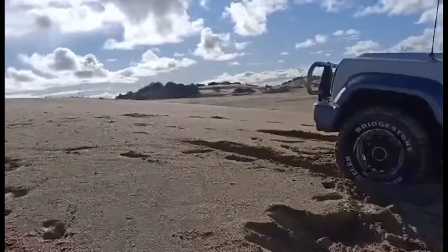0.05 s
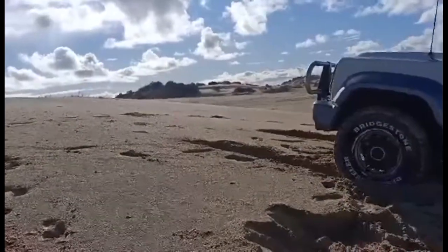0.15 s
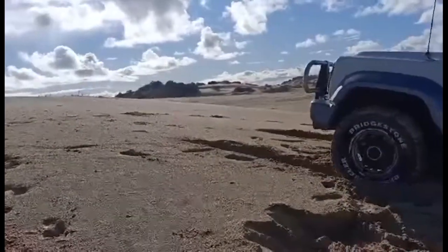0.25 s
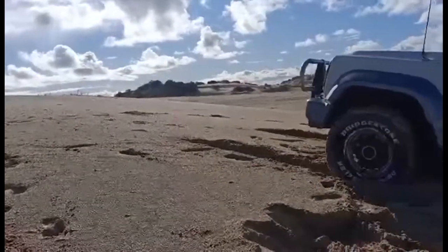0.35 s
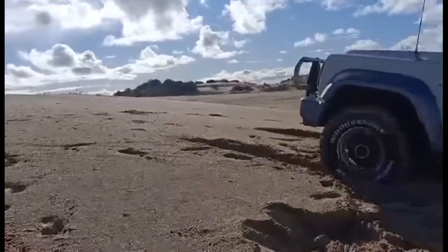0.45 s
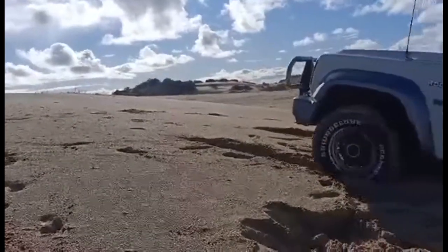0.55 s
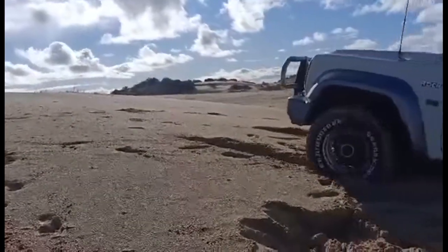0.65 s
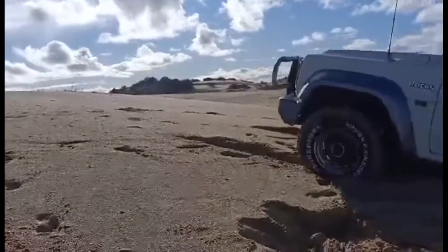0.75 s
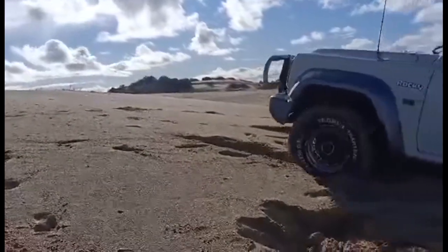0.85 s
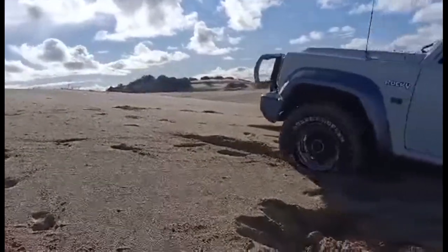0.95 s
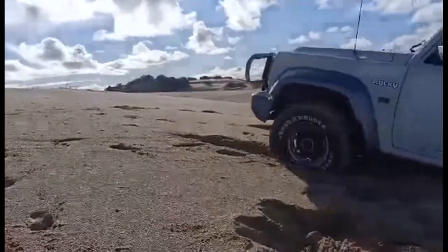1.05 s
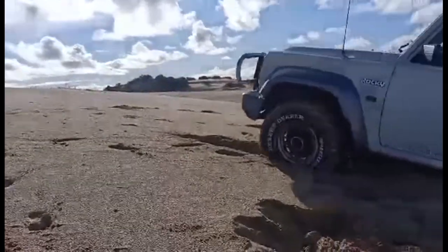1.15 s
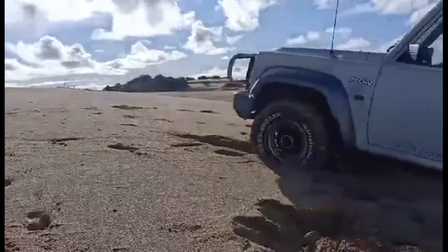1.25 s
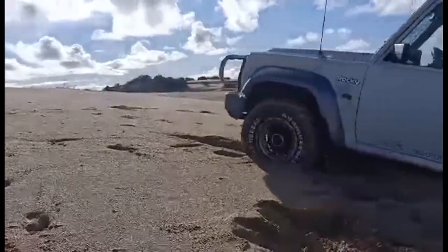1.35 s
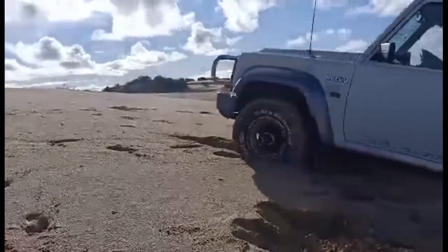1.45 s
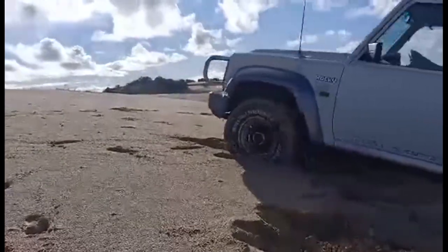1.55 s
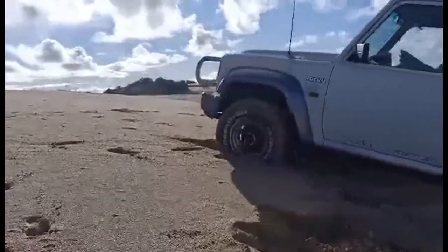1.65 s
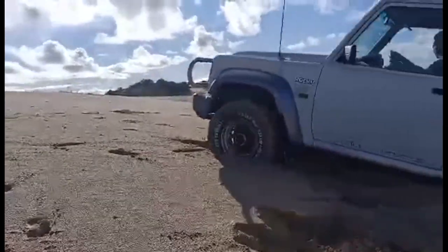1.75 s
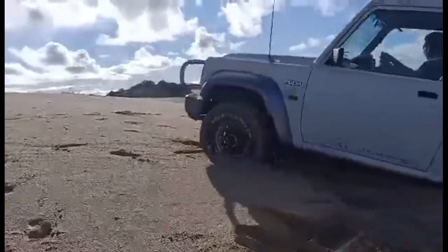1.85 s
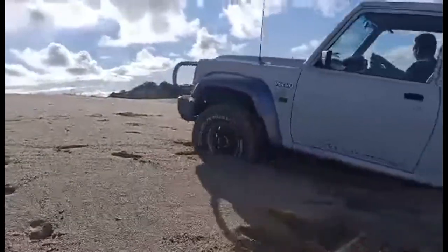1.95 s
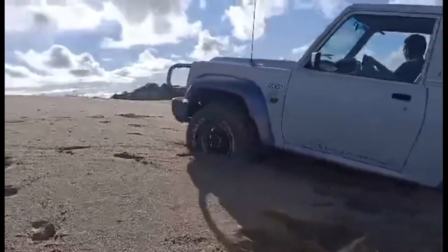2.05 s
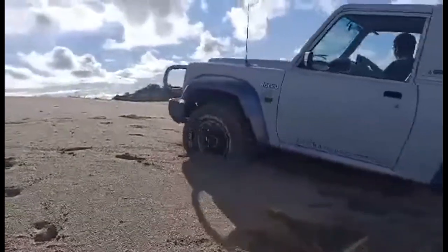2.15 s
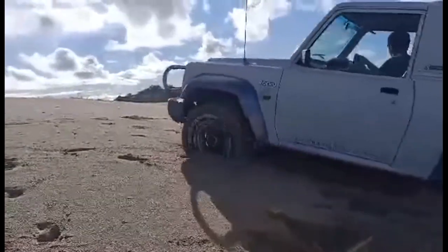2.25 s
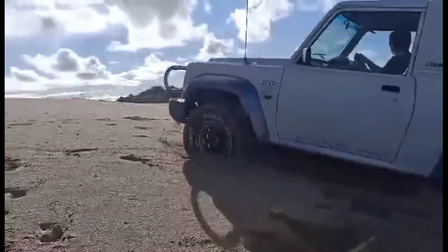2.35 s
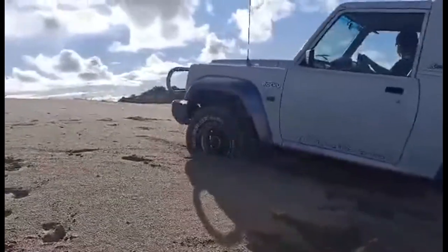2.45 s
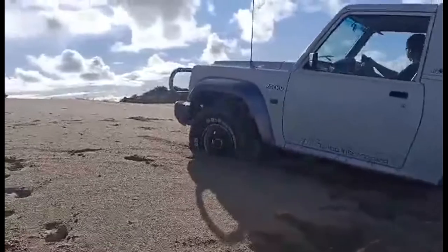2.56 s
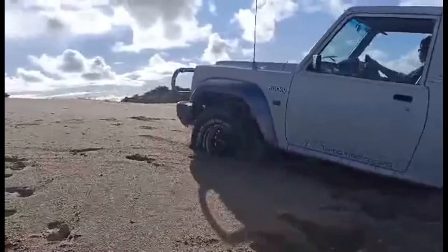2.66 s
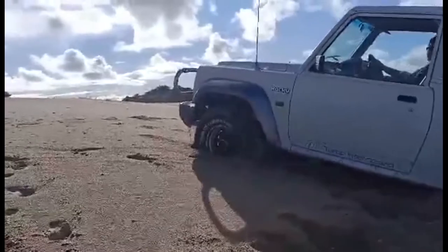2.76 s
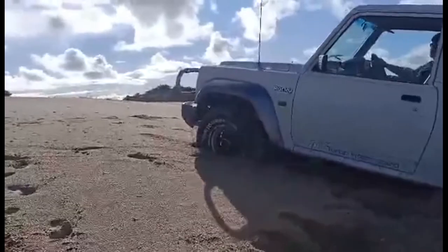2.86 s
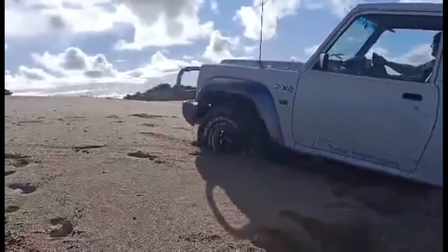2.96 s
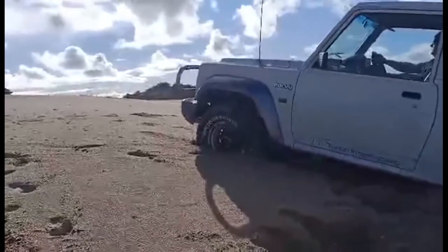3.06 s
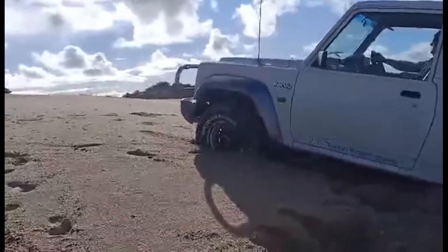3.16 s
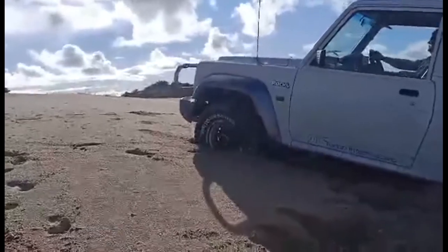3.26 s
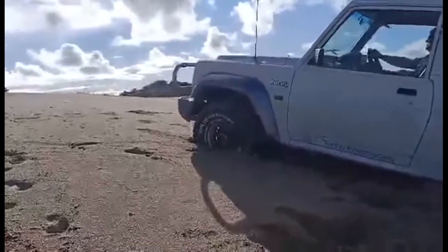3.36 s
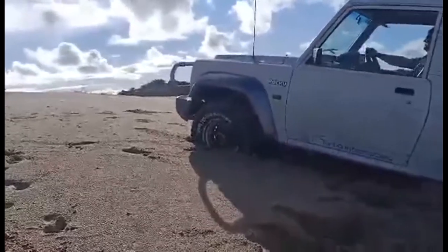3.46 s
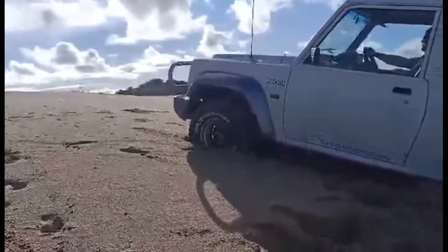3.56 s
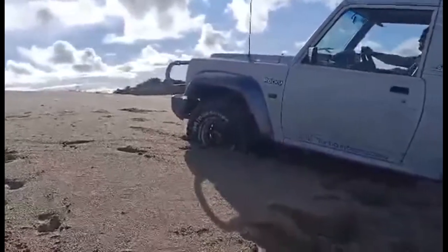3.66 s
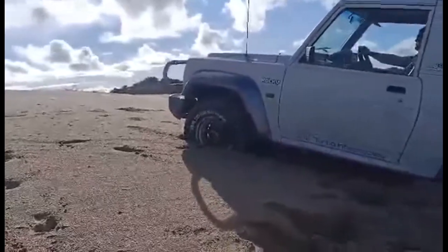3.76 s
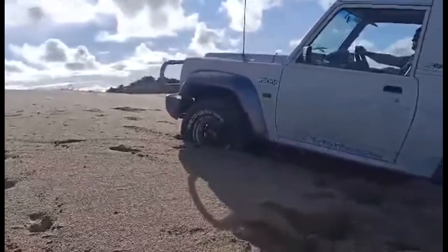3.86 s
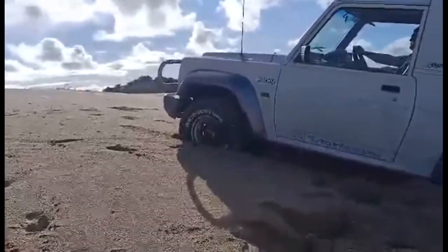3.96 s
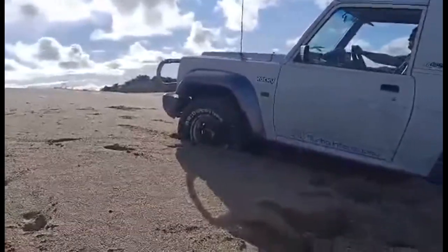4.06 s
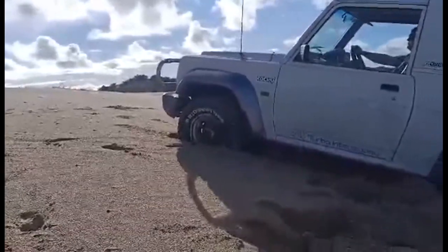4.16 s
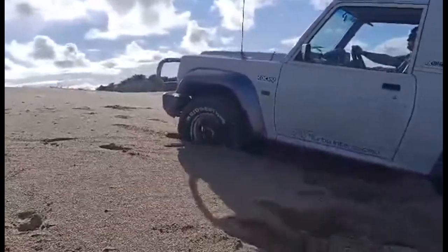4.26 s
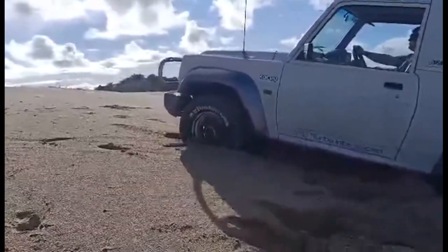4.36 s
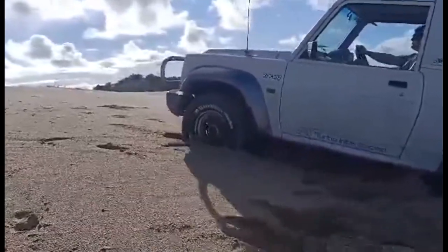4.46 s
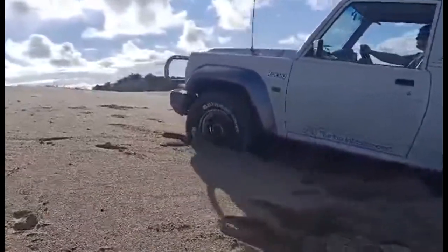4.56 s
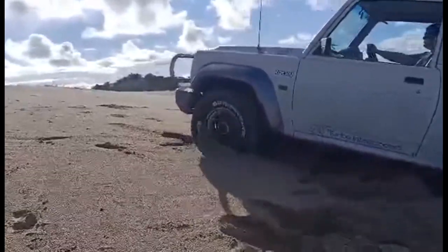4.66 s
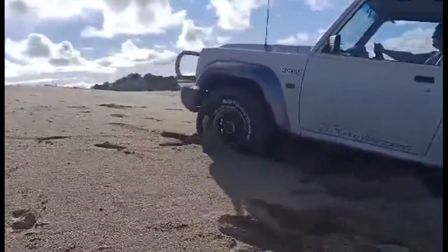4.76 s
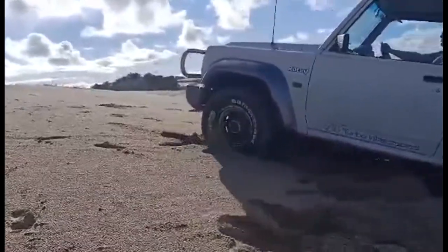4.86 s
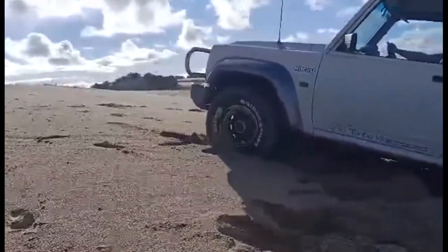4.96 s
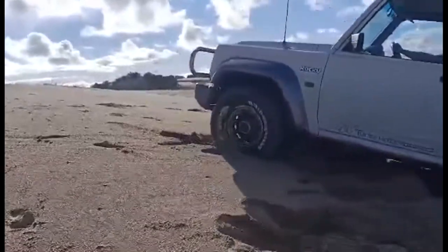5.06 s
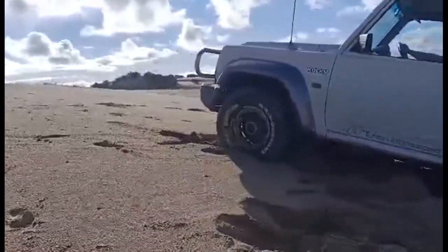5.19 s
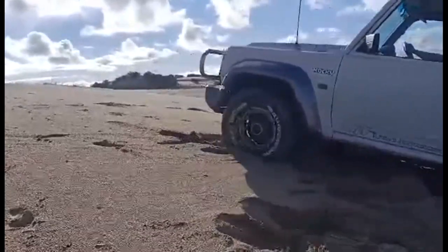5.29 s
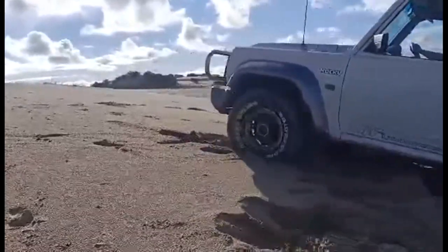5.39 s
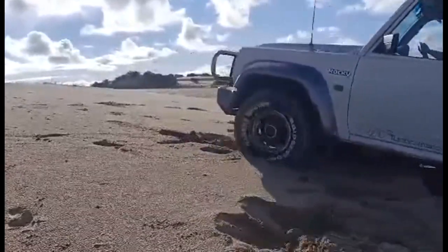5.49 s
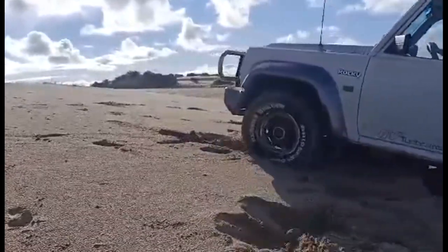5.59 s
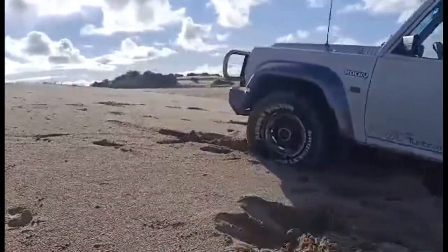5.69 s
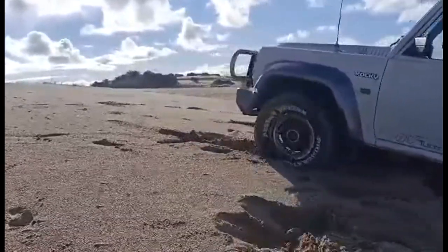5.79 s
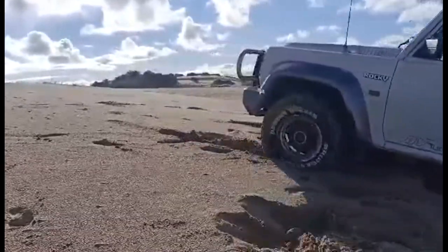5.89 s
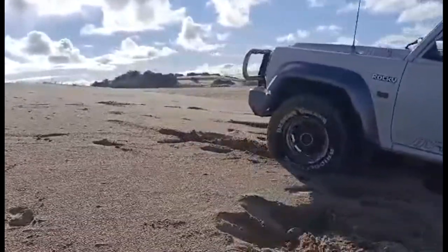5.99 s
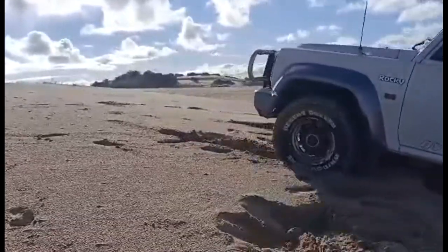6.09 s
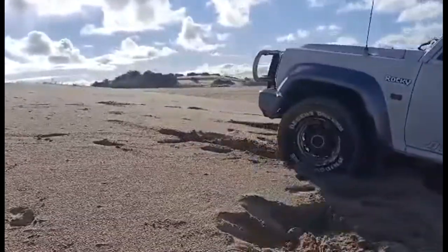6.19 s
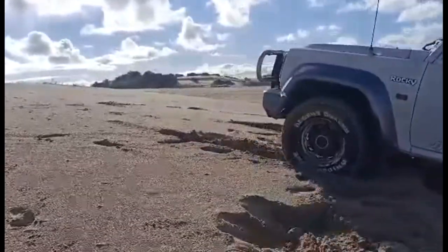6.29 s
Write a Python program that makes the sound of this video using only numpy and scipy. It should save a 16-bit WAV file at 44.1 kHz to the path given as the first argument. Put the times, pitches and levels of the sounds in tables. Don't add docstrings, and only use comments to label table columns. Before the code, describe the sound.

A four-cylinder turbo diesel off-roader is heard close by on an open beach, dry and without echo, through a small microphone with limited deep bass. It begins with a low roar at slow revs, then picks up by 0.3 seconds with two short driveline knocks. The muffler rings at about 0.8 as the wheels bite. From 1 to 2.4 seconds the engine pulls harder and faster, with throbbing, popping exhaust, sharp rhythmic clatter and growing turbo hiss. It flares loudest around 2.5, injectors pinging and the rattle turning more continuous. At 2.8 the load drops with a clunk; a low burble follows near 2.9 as revs fall until about 3.6. A quieter, uneven idle runs on, swelling slightly toward 4.7. Small knocks come at 4.9, where the engine sinks and a low roar lurches, again at 5.3. Slow, soft throbbing with dull knocks continues to the end near 6.3.

```python
import sys
import numpy as np
from scipy import signal
from scipy.fft import rfft, irfft, next_fast_len
from scipy.io import wavfile
from scipy.ndimage import uniform_filter1d

SR = 44100
rng = np.random.default_rng(int(sys.argv[2]) if len(sys.argv) > 2 else 0)


def generate_wav(sig):
    pcm = np.round(np.clip(np.atleast_2d(sig).T, -1, 1) * 32767).astype(np.int16)
    wavfile.write(sys.argv[1], SR, pcm)


def convert_level_to_amplitude(level_db):
    exponent = np.asarray(level_db, float) / 20
    return 10 ** exponent


N = 279153


def rms_one(x):
    return x / np.sqrt(np.mean(x ** 2) + 1e-20)


def evened(x, seconds=0.167):
    return x / np.sqrt(uniform_filter1d(x ** 2, int(seconds * SR), mode="reflect") + 1e-12)


def in_time(rows):
    s, *columns = np.transpose(rows)
    return [np.interp(np.arange(N) / SR, s, c) for c in columns]


def swell(s, half_s, db):
    return db * np.exp(-((np.arange(N) / SR - s) / half_s) ** 2)


def coloured(x, points):
    hz, db = np.transpose(points)
    size = next_fast_len(N)
    grid = np.log(np.arange(size // 2 + 1) * SR / size + 1)
    gain_db = np.interp(grid, np.log(hz), db, left=-90, right=-90)
    return irfft(rfft(x, size) * convert_level_to_amplitude(gain_db), size)[:N]


def resonances(x, modes):
    out = 0
    for k, (hz, width_hz, db) in enumerate(modes):
        r = np.exp(-np.pi * width_hz / SR)
        b = (-1) ** k * convert_level_to_amplitude(db) * (1 - r * r) / 2 * np.array([1, 0, -1])
        a = [1, -2 * r * np.cos(2 * np.pi * hz / SR), r * r]
        out = out + signal.lfilter(b, a, x + 1e-18)
    return out


# pop in dB, ping in dB, clatter in dB.
CYLINDERS = [
    [(-11, -5, -3), (0, -1, -2), (-16, -6, -3.5), (-12, 0, 0)],
    [(-1, 0, -.5), (-2, -4, -1.5), (-1.5, -.5, -.3), (-2.5, -5, -2.5)],
]


def firings(turns, pulling, column, early, scatter_db):
    number = np.floor(turns + early).astype(int)
    at = np.flatnonzero(np.diff(number)) + 1
    loaded, free = np.array(CYLINDERS)[:, number[at] % 4, column]
    luck = rng.standard_normal(N // 500)[:len(at)]
    clicks = np.zeros(N)
    clicks[at] = convert_level_to_amplitude(loaded * pulling[at] + free * (2.5 - pulling[at]) + scatter_db * luck)
    return clicks


def burst(clicks, rise_s, fall_s):
    for s in (rise_s, fall_s):
        r = np.exp(-1 / (s * SR))
        clicks = signal.lfilter([1 - r], [1, -r], clicks + 1e-18)
    return evened(clicks)


def gritty(spread_db):
    grains_db = spread_db * rng.standard_normal(N // 40 + 1).repeat(40)[:N]
    return rms_one(rng.standard_normal(N) * convert_level_to_amplitude(grains_db))


def struck(shaking, turns, modes, uneven_db):
    number = np.floor(turns + 0.36).astype(int) + 1
    luck = convert_level_to_amplitude(uneven_db * rng.standard_normal((len(modes), N // 500)))
    out = 0
    for k, (mode, own) in enumerate(zip(modes, luck)):
        out = out + resonances(shaking * own[number], [mode]) * (-1) ** k
    return out


def follow(engine, usual_db, share, per_octave_db, pull_db):
    drive_db, per_s, pulling = engine
    swing_db = share * (drive_db + 40)
    return usual_db + swing_db + per_octave_db * np.log2(per_s / 35) + pull_db * pulling


def on_pipe_mode(per_s):
    return 1 / (1 + ((4 * per_s - 246.6) / 49) ** 2)


def merged_db(per_s):
    return -0.64 * np.maximum(per_s - 65, 0)


# frequency in Hz, level in dB.
EXHAUST = [(22, -24), (34, -11), (50, 2.5), (89, 9), (124, 3), (140, -11), (185, 0.5), (245, -3.5)]


def throb(turns, engine, pop_db):
    hz, db = np.transpose(EXHAUST)
    fuel_db, per_s, pulling = engine
    lag_s, phase_turns = .006, (.3, .3, .55, .85, .6)
    burble_db = swell(2.91, .17, 8)
    tuning = 1 + 0.071 * np.clip((per_s - 55) / 25, 0, 1)
    levels_db = []
    for k in range(1, 5):
        from_burble = (k * per_s - 190) / 35
        order_db = fuel_db + np.interp(np.log(k * per_s / tuning), np.log(hz), db)
        order_db = order_db + (k - 1) * merged_db(per_s) + burble_db / (1 + from_burble ** 2)
        levels_db.append(order_db - 10 * (1 - pulling) * np.clip(from_burble - .5, 0, 1))
    fifth_db = pop_db - 8 * (1 - pulling) + 1.3 * merged_db(per_s) - 4
    levels_db.append(fifth_db - 20 * np.log10(1 + ((5 * per_s - 205) / 70) ** 2))
    out = 0
    for k, level_db in enumerate(levels_db):
        cycle = (k + 1) * (turns - lag_s * per_s) + phase_turns[k]
        out = out + np.sqrt(2) * convert_level_to_amplitude(level_db) * np.cos(2 * np.pi * cycle)
    return out


# frequency in Hz, width in Hz, level in dB.
PIPE_MODES = [(186.2, 57, -0.5), (233.2, 70.5, -1.5)]
# frequency in Hz, width in Hz, level in dB.
MUFFLER_MODES = [(291.6, 94, 5), (446, 128, -9)]
# frequency in Hz, level in dB per Hz.
RUMBLE = [(18, -52), (30, -6), (138, -4.5), (234, -5), (283, -17), (318, -8.5), (353, -19), (517, -24),
          (635, -29.5), (1000, -36.5), (1300, -94), (2200, -120)]
# middle in seconds, half length in seconds, level in dB.
RING_SWELLS = [
    (.78, .12, 5),
    (2.42, .12, 2.5),
    (4.5, .25, 3),
]
# middle in seconds, half length in seconds, level in dB.
LURCHES = [
    (.01, 0.099, 6),
    (4.932, 0.1, 5.5),
    (5.33, 0.13, 4),
    (3.31, 0.085, -1.5),
    (4.54, 0.23, -3.5),
]


def tail_pipe(turns, engine, pop_db):
    fuel_db, per_s, pulling = engine
    ring_db = follow(engine, usual_db=-38.5, share=1.02, per_octave_db=-2, pull_db=-6)
    ring_db = ring_db + 9 * on_pipe_mode(per_s) + 0.62 * merged_db(per_s)
    ring_db = ring_db + sum(swell(*row) for row in RING_SWELLS)
    capped = (fuel_db, np.minimum(per_s, 42), pulling)
    roar_db = follow(capped, usual_db=-35, share=0.102, per_octave_db=6, pull_db=8)
    roar_db = roar_db - 2 * on_pipe_mode(per_s) + sum(swell(*row) for row in LURCHES)

    slugs = firings(turns, pulling, column=0, early=.3 + .0058 * per_s, scatter_db=1.5)
    pops = evened(resonances(resonances(slugs, PIPE_MODES), [(235, 440, 0)]))
    rough = slugs + 0.017 * (1 - 0.14 * pulling) * rng.standard_normal(N)
    ring = evened(resonances(resonances(rough, MUFFLER_MODES), [(313.5, 173, 0)]))

    gusts = firings(turns, 0 * pulling, column=0, early=0.064, scatter_db=8.5)
    puffs = 5.5 + burst(gusts, 0.003, 0.028)
    flow = coloured(puffs * rng.standard_normal(N), RUMBLE)
    flow = signal.sosfilt(signal.butter(2, 40, "high", fs=SR, output="sos"), flow)
    rumble = evened(flow + 0.56 * resonances(flow, [(130, 91, 0)]), 0.55)
    exhaust = convert_level_to_amplitude(pop_db - 5.5) * pops + convert_level_to_amplitude(ring_db - 5.0) * ring
    return exhaust + convert_level_to_amplitude(roar_db + 2.5 - 7.1 * pulling) * rumble


# frequency in Hz, width in Hz, level in dB.
COVER_MODES = [(2053, 78, 7.5), (2760, 170, -14), (3762, 91, 0.5)]
# frequency in Hz, level in dB per Hz.
CLATTER = [(820, -30), (1400, -30), (1500, -11), (1710, -13.5), (2080, -14), (2290, -14.5), (2590, -9.5),
           (3110, -12), (3780, -10.5), (4850, -26.5), (6110, -22.5), (6860, -14.5), (9160, -23.5),
           (13300, -28), (14000, -21)]
# frequency in Hz, level in dB per Hz.
IDLE_CLATTER = [(820, -39), (1400, 3), (1670, -8), (1830, -6), (2400, -11.5), (3240, -8), (5090, -20),
                (6290, -13.5), (7200, -12), (10400, -21.5), (14000, -21.5)]
# frequency in Hz, width in Hz, level in dB.
PING_MODES = [(729, 52, 2), (876, 87, 0), (1072, 197, 0), (1257.5, 78, 5.5), (1257, 73, 4.5),
              (1410, 110, -1.5)]


def block(turns, engine, locked):
    clatter_db, per_s, pulling = engine
    loose = np.sqrt(1 - locked ** 2)
    knock = burst(firings(turns, pulling, column=2, early=0.26, scatter_db=-0.68), 0.004, 0.0057)
    casting = [(hz, 0.033 * hz, 0) for hz in np.geomspace(1500, 14000, num=36)]
    shaking = (locked * knock + loose) * gritty(2.5)
    rattle = struck(shaking, turns, [*casting, *COVER_MODES], uneven_db=2.5)
    loaded = evened(coloured(rattle, CLATTER), 0.237)
    free = evened(coloured(rattle, IDLE_CLATTER), 0.237)
    clatter = evened(pulling * loaded + (1 - pulling) * free, 0.199)

    advance = 0.14 + 0.2 * pulling
    opening = firings(turns, pulling, column=1, early=advance, scatter_db=1.5)
    ticks = burst(opening, 0.0015, 0.0016) + 1.85 * knock
    shaking = (locked * evened(ticks) + .9 * loose) * gritty(2.0)
    ping = struck(shaking, turns, PING_MODES, uneven_db=2.5)
    ping = signal.sosfilt(signal.butter(2, [640, 1600], "band", fs=SR, output="sos"), ping)
    ping_db = follow(engine, usual_db=-31, share=1.5, per_octave_db=-2.4, pull_db=1.5)
    ping_db = ping_db + swell(2.49, 0.07, 3.1)
    return convert_level_to_amplitude(clatter_db) * clatter + convert_level_to_amplitude(ping_db - 2.5) * evened(ping, 0.266)


def turbo(turns, engine):
    hiss = resonances(resonances(gritty(1.7), [(6860, 750, 0)]), [(6240, 2500, 0)])
    boost = np.clip((engine[1] - 36) / 26, .1, 1)
    gulps = 1 + 0.66 * np.cos(2 * np.pi * (turns - .05))
    hiss_db = follow(engine, usual_db=-47, share=1.6, per_octave_db=3, pull_db=1)
    hiss_db = hiss_db + swell(2.22, 0.24, 4.2)
    return convert_level_to_amplitude(hiss_db - 4.5) * boost * gulps * rms_one(hiss)


# start in seconds, peak level in dB, frequency in Hz, decay in seconds.
CLUNKS = [(0.226, -17, 185, 0.0025), (0.333, -15, 250, 0.0014), (2.8086, -15.5, 281, 0.0075),
          (2.83, -37.5, 3640, 0.0026), (4.2, -37.5, 537, 0.0034), (4.903, -24, 490, 0.0015),
          (4.926, -27.5, 295, 0.0024), (5.455, -26.5, 130, 0.0093), (5.49, -29, 121, 0.014),
          (5.717, -26.5, 118, 0.016), (5.813, -26.5, 130, 0.011), (6.147, -30.5, 146, 0.0062),
          (6.194, -34, 335, 0.0047)]


def clunks():
    out = np.zeros(N)
    after = np.arange(SR // 20) / SR
    for s, db, hz, decay_s in CLUNKS:
        knock = np.sin(2 * np.pi * hz * after) * np.exp(-after / decay_s) * (1 - np.exp(-after / 0.00064))
        crack = signal.lfilter([.4], [1, -.6], rng.standard_normal(len(after))) * np.exp(-after / 0.006)
        at = round(s * SR)
        out[at:at + len(after)] += convert_level_to_amplitude(db) * (2.28 * knock + 0.045 * crack)
    return out


# time in seconds, firings per second.
SPEED = [(0.0, 27.07), (0.365, 38.58), (0.645, 33.51), (0.95, 35.99), (1.385, 44.36), (1.595, 45.56),
         (1.8, 53.62), (2.155, 63.68), (2.385, 62.19), (2.615, 76.72), (2.75, 56.59), (3.645, 26.65),
         (4.01, 30.3), (4.23, 27.48), (4.73, 28.16), (5.0, 23.68), (5.21, 22.11), (6.33, 20.74)]
# time in seconds, level in dB.
FUEL = [(0.0, -45), (0.32, -36), (0.6, -36.5), (1.17, -30.5), (1.93, -25.5), (2.43, -26), (2.53, -20),
        (2.76, -35), (3.22, -37), (3.38, -42), (3.45, -41.5), (3.67, -47), (3.77, -40.5), (4.69, -36.8),
        (5.0, -54), (5.35, -45), (5.51, -51.5), (6.33, -50.5)]
# time in seconds, clatter level in dB, share of clatter in step with the firings from 0 to 1.
KNOCK = [(0, -58.5, .4), (.3, -48.5, 0.95), (.5, -49.5, 0.95), (.78, -45, 0.98), (1.2, -43, 0.99),
         (1.8, -41, 1), (2.12, -43, 0.87), (2.4, -40.5, 1), (2.55, -39.5, 0.25), (2.66, -45.5, 0),
         (3.3, -52.5, 0.16), (3.6, -54.5, 0.5), (4.2, -55.5, 0.73), (4.65, -52, 0.79), (4.85, -56, 0.53),
         (5.55, -59, 0.51), (5.75, -58, 0.63), (6.33, -60, 0.5)]


def scene():
    (per_s,), (fuel_db,), (clatter_db, locked) = in_time(SPEED), in_time(FUEL), in_time(KNOCK)
    turns = -.062 + np.cumsum(per_s) / SR
    pulling = 1 / (1 + np.exp((np.arange(N) / SR - 2.6) / 0.1))
    gas, metal = (fuel_db, per_s, pulling), (clatter_db, per_s, pulling)
    pop_db = follow(gas, usual_db=-40, share=0.9718, per_octave_db=0, pull_db=2.5)
    pop_db = pop_db + 8.5 * on_pipe_mode(per_s) + 1.1 * merged_db(per_s)
    pop_db = pop_db + swell(2.91, .17, 7)
    exhaust = throb(turns, gas, pop_db) + tail_pipe(turns, gas, pop_db)
    engine = exhaust + block(turns, metal, np.clip(locked, 0, 1)) + turbo(turns, metal)
    return (engine + clunks())[None]


# middle in seconds, length in seconds, share of tones kept, lowest frequency touched in Hz.
THIN_MOMENTS = [(.07, .035, .12, 2500), (.49, .03, .2, 4200), (1.008, .058, .06, 3500),
                (2.184, .03, .08, 1800), (2.23, .03, .08, 1800), (2.322, .028, .1, 3000),
                (2.392, .03, .08, 1800), (2.507, .028, .12, 2000), (2.613, .056, .04, 1800),
                (2.788, .03, .07, 1800), (3.535, .035, .2, 4000), (4.017, .035, .12, 2500),
                (4.423, .058, .05, 1600), (6.078, .035, .2, 2200)]


def thin_treble(x):
    out = x.copy()
    for s, length_s, share, from_hz in THIN_MOMENTS:
        size = round(length_s * SR)
        at = round(s * SR) - size // 2
        fade = np.sqrt(signal.windows.tukey(size, .9))
        lines = rfft(x[at:at + size] * fade)
        treble = np.arange(len(lines)) * SR / size > from_hz
        weak = treble & (abs(lines) < np.quantile(abs(lines[treble]), 1 - share))
        out[at:at + size] -= fade * irfft(lines * weak, size)
    return out


def band_limit(x):
    return signal.sosfilt(signal.butter(12, 14610, fs=SR, output="sos"), x)


def record(dry):
    x = signal.sosfilt(signal.butter(2, 25, "high", fs=SR, output="sos"), dry)
    x = signal.sosfilt(signal.cheby2(16, 60, 14650, fs=SR, output="sos"), x)
    mix = thin_treble(x[0])[None]
    return band_limit(mix)


dry = scene()
out = record(dry)
generate_wav(out)
```